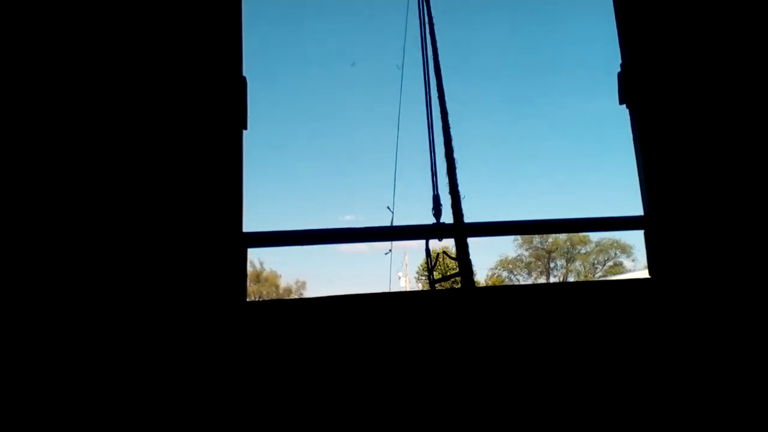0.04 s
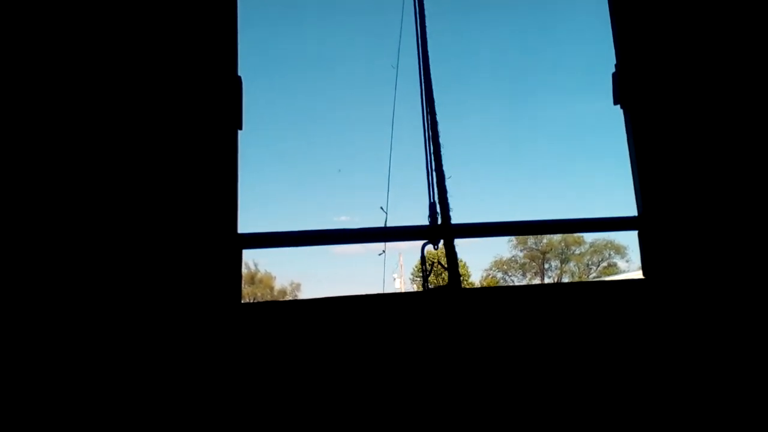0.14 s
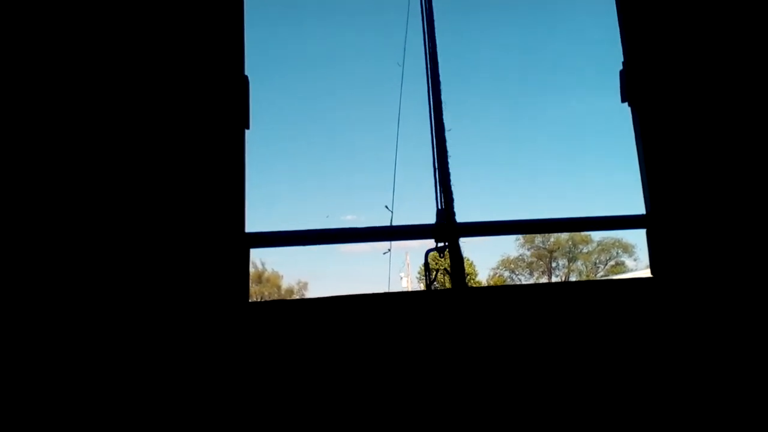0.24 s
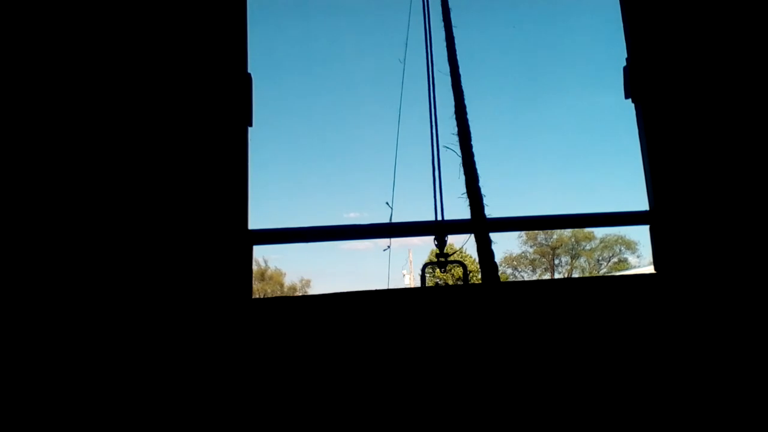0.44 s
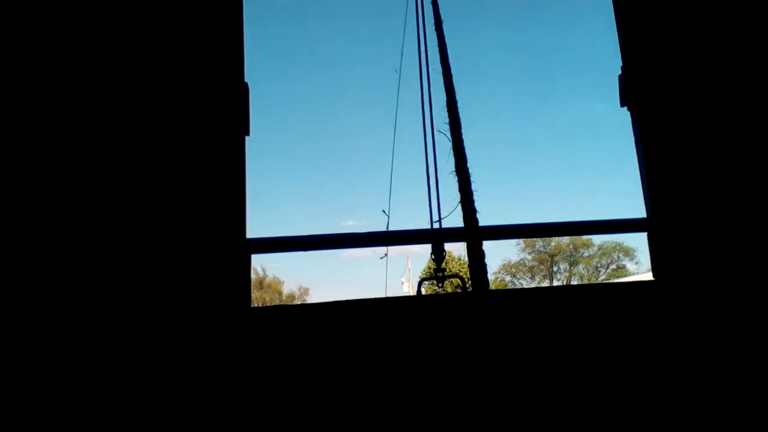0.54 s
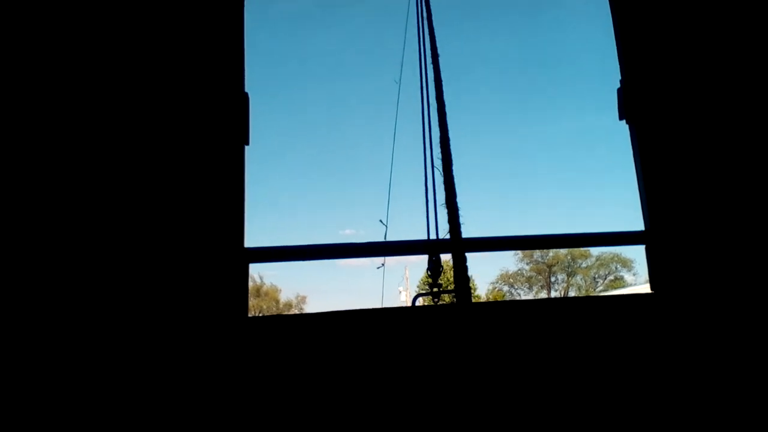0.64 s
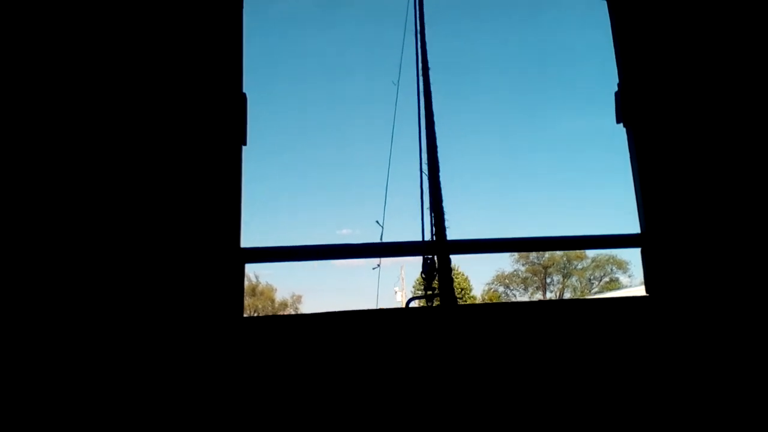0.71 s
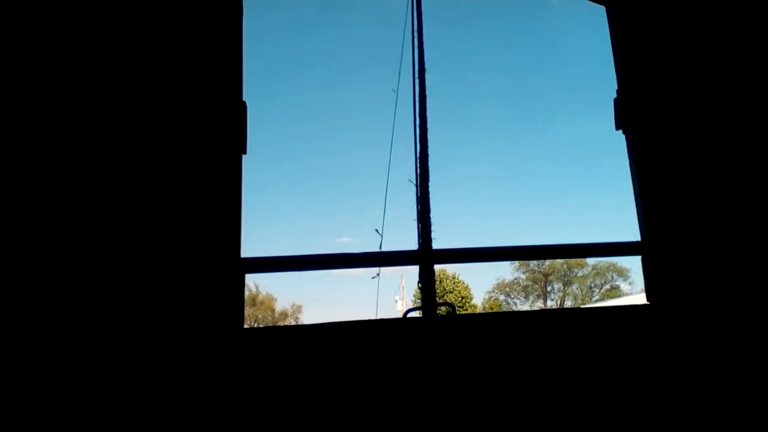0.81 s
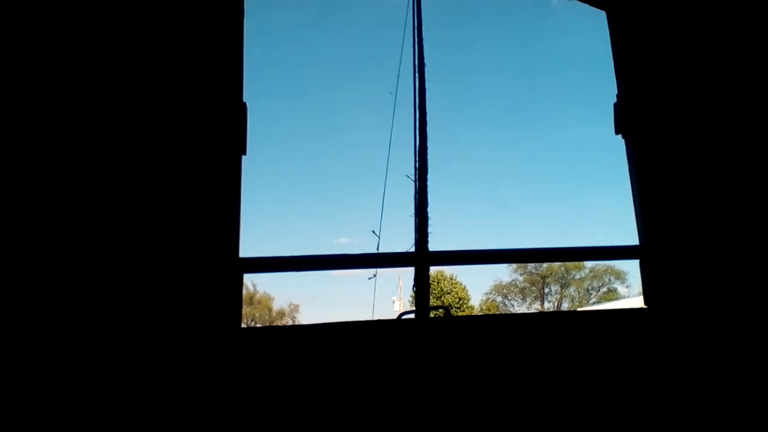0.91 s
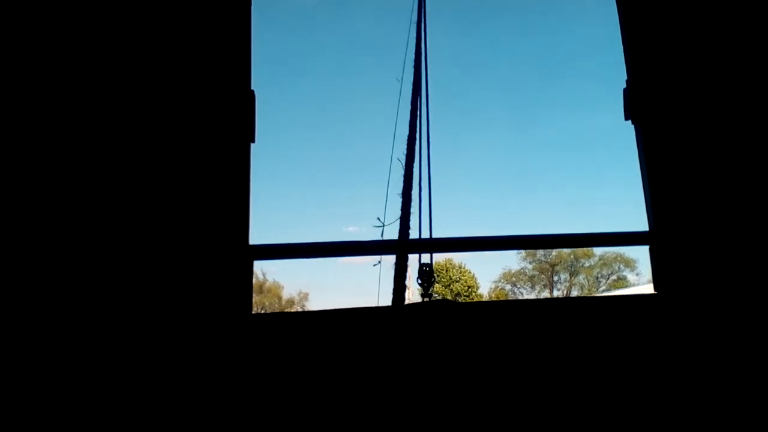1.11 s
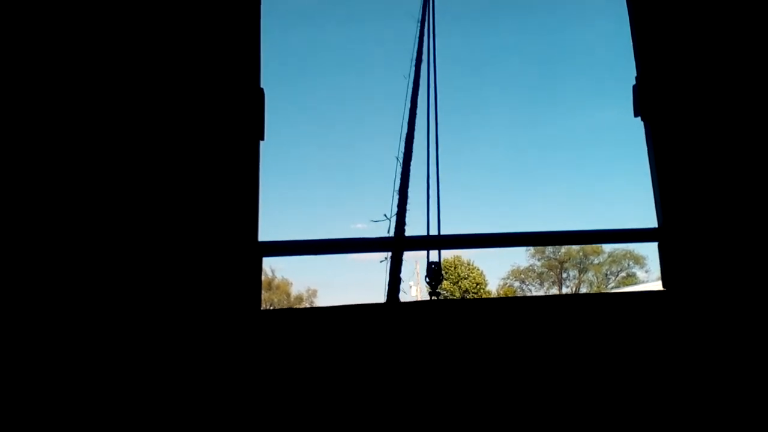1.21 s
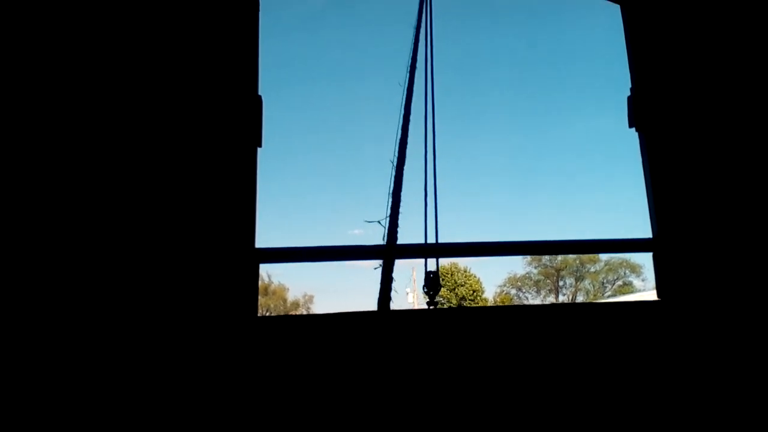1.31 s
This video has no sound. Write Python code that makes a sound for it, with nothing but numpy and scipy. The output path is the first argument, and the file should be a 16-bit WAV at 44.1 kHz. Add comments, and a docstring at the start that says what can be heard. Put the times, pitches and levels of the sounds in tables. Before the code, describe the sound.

Rope and pulley gear thuds against timbers inside a wooden barn, just after a very faint squeak. A low boom dies away with a few soft bumps and light rope rubbing, heard through one microphone over soft hiss.

```python
"""A quick cluster of dull thuds as rope rigging jerks taut against timbers, heard inside a wooden barn.
A faint pulley squeak leads in; the rope creaks under the load and the pulley block knocks. Near boards
echo each blow, the building booms and dies away, and the rope rubs and hums as it settles.
One microphone, mono. Behind it all: a soft hiss that swells and briefly drops out, a thin high hiss
and a faint rumble."""
import sys
import numpy as np
from scipy import signal
from scipy.fft import rfft, irfft
from scipy.io import wavfile

SR = 44100
rng = np.random.default_rng(int(sys.argv[2]) if len(sys.argv) > 2 else 0)


def pcm_store(signal):
    """Save signal as 16-bit PCM."""
    levels = np.round(np.clip(np.atleast_2d(signal), -1, 1) * 32767)
    wavfile.write(sys.argv[1], SR, levels.astype(np.int16).T)


N = 59535
T = np.arange(N) / SR

# Blows on the timbers. Each row: start in seconds, relative level in dB, contact time in ms.
TIMBER_BLOWS = [(0.2148, -23.5, .9), (0.2227, -1, 0.3), (.244, 0, 0.37), (0.2614, 5, 0.67),
                (.277, -0.5, 0.76), (.323, -7, 1), (.33, -5, 0.31), (.386, -10, 0.8), (0.403, -11.5, 0.26),
                (.545, -15, 3.0), (0.661, -15, 3.64), (.742, -12.5, 4.4)]
# Knocks of the pulley block. Each row: start in seconds, relative level in dB.
BLOCK_KNOCKS = [(.2885, -10.5), (.2912, 0), (.2975, -9), (.3055, -8)]

# How each body rings. Each row: frequency in Hz, relative level in dB, seconds to fall 60 dB.
TIMBER_MODES = [(132.9, -10.5, 0.82), (176.7, -3, 0.12), (209.4, 2.5, 0.41), (274, -7.5, 0.39),
                (340.9, -6, 1), (377.6, -2.5, 0.59), (400, -16.5, 0.1), (620, -15.5, 0.25),
                (751, 2.5, 0.52), (860, 0.5, 0.34), (826, 4, 0.43), (1095, -12.5, 0.74), (1103, -3.5, 0.18),
                (1269, 6.5, 0.33)]
BLOCK_MODES = [(618, -20, .1), (718, 2.5, .22), (750, -5, 0.065), (910, -5, 0.17), (1526, -3, .11),
               (1564, 2.5, 0.034), (1711, 4.5, 0.21), (1740, -13.5, 0.082)]
CREAK_MODES = [(1281, -0.5, 0.15), (1360, -8, 0.01), (1780, 4, 0.005), (2172, -5.5, 0.045),
               (2447, -7.5, 0.031)]
BUILDING_MODES = [(42.8, -8.5, 1.6), (62.15, 4, 0.43), (68.7, 0.5, 0.17), (83.2, 2, .6)]

# Colour of each crack and noise. Each row: frequency in Hz, relative spectral density in dB.
TIMBER_CRACK_COLOUR = [(30, -37.5), (85, -15.5), (170, 0.5), (300, -6), (540, -5.5), (820, -0.5),
                       (1000, -6.5), (1400, -7), (2400, -5), (3200, -13.5), (4200, -23.5), (5300, -40),
                       (6500, -86)]
BLOCK_CRACK_COLOUR = [(30, -24), (150, -9), (420, -3), (560, -1.5), (800, 1), (1050, -9.5), (1620, -2.5),
                      (2000, -8), (2500, -6), (3200, -14.5), (4200, -25.5), (5300, -45), (6500, -84.5)]
BOOM_COLOUR = [(20, -17), (40, -7.5), (62, -0.5), (80, -5.5), (110, 2.5), (200, -30), (500, -73)]
RUB_COLOUR = [(100, -17), (300, -7), (650, 1.5), (1000, -15.5), (1450, 4), (1750, -3), (2300, -11),
              (3000, -17), (5000, -53)]
SOFT_HISS_COLOUR = [(100, -4.5), (500, -13), (1000, -12.5), (1450, -12), (1850, -7), (2100, 1), (2450, 0.5),
                    (3100, -0.5), (3700, -6.5), (4400, -17), (5300, -38.5), (7000, -61)]
HIGH_HISS_COLOUR = [(5000, -32.5), (10500, -30.5), (11300, -16.5), (12200, -12), (13000, -5), (13800, 0),
                    (14600, -4), (15500, -15.5)]
RUMBLE_COLOUR = [(20, -19.5), (65, 0.5), (170, -3), (300, -9.5), (700, -16), (1500, -15.5),
                 (3000, -30), (5500, -55), (9000, -85.5)]

# Treble loss of the ringing parts. Each row: frequency in Hz, relative gain in dB.
RING_TREBLE_LOSS = [(2500, -3.5), (4000, -5), (6000, -54)]
# Reverberation of the barn. Each row: frequency in Hz, seconds to fall 60 dB.
BARN_T60 = [(60, 0.95), (150, 0.73), (400, 0.8), (800, 0.52), (1500, 0.37), (4000, 0.33)]
# Level of the two background hisses over time. Each row: time in seconds, level in dB.
SOFT_HISS_LEVEL = [(0, -67.5), (.17, -62), (.26, -59.5), (.5, -64), (.62, -61.5), (.76, -63), (.8, -69),
                   (.845, -87.5), (.89, -83.5), (.93, -75), (1.01, -69), (1.13, -65.5), (1.19, -69),
                   (1.24, -65), (1.29, -72), (1.35, -72)]
HIGH_HISS_LEVEL = [(0, -73), (.12, -71), (.18, -69.5), (.23, -68.5), (.26, -73), (.33, -72.5), (.38, -69),
                   (.43, -73), (.47, -69), (.7, -69.5), (.82, -70.5), (1.03, -74), (1.1, -70.5),
                   (1.25, -70.5), (1.35, -71.5)]


def timber_thuds():
    """The rope snatches at the timbers in a cluster of dull blows, then bumps softly as it settles."""
    force = sum(blow(at, db, contact_ms) for at, db, contact_ms in TIMBER_BLOWS)
    return undb(-4.5) * struck_wood(force, TIMBER_CRACK_COLOUR, TIMBER_MODES, ring_db=-5.5, room_db=-1)


def block_knocks():
    """The pulley block knocks and rebounds in short, hard contacts."""
    force = sum(blow(at, db, contact_ms=0.089) for at, db in BLOCK_KNOCKS)
    return undb(-9) * struck_wood(force, BLOCK_CRACK_COLOUR, BLOCK_MODES, ring_db=7, room_db=0)


def blow(at, db, contact_ms):
    """The force of one blow; a longer contact is duller."""
    force = (T >= at) * np.exp(-np.maximum(T - at, 0) * 1000 / contact_ms)
    return undb(db) * force / force.sum()


def struck_wood(force, colour, modes, ring_db, room_db):
    """A crack and a ring reach the microphone directly and by way of the barn."""
    crack = wood_smear(convolve(force, causal_response(colour)))
    ring = undb(ring_db) * convolve(force, muffled_ring(modes))
    into_room = crack + undb(-17.5) * ring  # the ring sends less into the room than the crack
    return crack + ring + undb(room_db) * barn_echoes(into_room)


def wood_smear(crack):
    """Travelling through wood spreads a sharp crack over a few milliseconds."""
    for hz in (500, 1300, 2330):
        b, a = signal.iirpeak(hz, Q=1.27, fs=SR)
        crack = crack - 2 * signal.lfilter(b, a, crack)  # all-pass: delays this range a little
    return crack


def muffled_ring(modes):
    """The decaying modes of a struck body, without the click at their start."""
    ring = sum(undb(db) * fade(t60) * np.sin(2 * np.pi * hz * T) for hz, db, t60 in modes)
    return unit_energy(convolve(ring, causal_response(RING_TREBLE_LOSS)))


def rope_creak():
    """A short burst of tiny slips as the rope takes the load."""
    slips_per_s = 3000
    slips = random_clicks(slips_per_s) * np.sqrt(SR / slips_per_s)  # rms near 1
    burst = slips * swell(at=0.2437, width_s=0.011)
    return undb(-35) * convolve(burst, muffled_ring(CREAK_MODES))


def building_boom():
    """Walls and floor take up the jolt slowly, swing in a few low modes and rumble on."""
    start_s, rise_s = 0.235, 0.095
    rise = np.clip((T - start_s) / rise_s, 0, 1) ** 2
    since_peak = T - start_s - rise_s
    envelope = lambda t60: rise * fade(t60, np.maximum(since_peak, 0))
    swing = sum(undb(db) * envelope(t60) * np.sin(2 * np.pi * hz * since_peak)
                for hz, db, t60 in BUILDING_MODES)
    rumble = envelope(t60=1.0) * noise(BOOM_COLOUR)
    return undb(-48) * swing + undb(-45.5) * rumble


def pulley_squeak():
    """The sheave gives a thin, unsteady, falling squeak just before the thuds."""
    at, centre_hz, sag_hz_per_s = 0.18, 2142, 1800
    waver = 0.005 * noise([(150, 0), (600, -40), (2000, -100)])
    hz = (centre_hz - sag_hz_per_s * (T - at)) * (1 + waver)
    return undb(-63.5) * swell(at, width_s=0.012) * tone(hz)


def rope_rub():
    """The taut rope rubs faintly and hums as it settles."""
    waver = 0.0083 * noise([(15, 0), (60, -40), (200, -100)])
    hum = swell(at=0.634, width_s=0.09) * tone(hz=130 * (1 + waver))
    rub = swell(at=0.636, width_s=0.047) * noise(RUB_COLOUR)
    return undb(-65.5) * rub + undb(-60) * hum


def barn_echoes(sound):
    """Echoes off near boards, then a diffuse tail in which the lows stay longest."""
    build_up = 1 - np.exp(-T / 0.0013)
    early = random_clicks(per_s=2500) * fade(t60=0.17) * build_up
    lowest_hz = 40
    octave = np.log2(np.maximum(np.fft.rfftfreq(N, 1 / SR), lowest_hz) / lowest_hz)
    spectrum = rfft(rng.standard_normal(N))
    tail = np.zeros(N)
    for k in range(9):
        band = irfft(spectrum * np.maximum(1 - abs(octave - k), 0), N)
        tail += band * fade(over_hz(BARN_T60, lowest_hz * 2 ** k))
    return convolve(sound, undb(2.5) * unit_energy(early) + undb(-2.5) * unit_energy(tail * build_up))


def background():
    """Background: a soft hiss that swells and briefly drops out, a thin high hiss and a low rumble."""
    gain = lambda levels: undb(np.interp(T, *np.array(levels).T))
    soft_hiss = gain(SOFT_HISS_LEVEL) * noise(SOFT_HISS_COLOUR)
    high_hiss = gain(HIGH_HISS_LEVEL) * noise(HIGH_HISS_COLOUR)
    return soft_hiss + high_hiss + undb(-74.5) * noise(RUMBLE_COLOUR)


def undb(db):
    """Decibels to gain."""
    return 10 ** (np.asarray(db) / 20)


def unit_energy(x):
    """Scale to an energy of one."""
    return x / np.sqrt(np.sum(x ** 2))


def fade(t60, age=T):
    """A decay of 60 dB in t60 seconds."""
    return np.exp(-np.log(1000) * age / t60)


def swell(at, width_s):
    """A smooth rise and fall around a moment given in seconds."""
    return np.exp(-.5 * ((T - at) / width_s) ** 2)


def tone(hz):
    """A sine that follows a moving pitch, rms 1."""
    return np.sqrt(2) * np.sin(2 * np.pi * np.cumsum(hz) / SR)


def random_clicks(per_s):
    """Impulses of either sign at random moments."""
    return (rng.random(N) < per_s / SR) * rng.choice([-1, 1], N)


def convolve(x, response):
    """Pass a sound through a response."""
    return signal.fftconvolve(x, response)[:N]


def over_hz(table, hz):
    """Read a table on a log-frequency axis."""
    table_hz, values = np.array(table, float).T
    return np.interp(np.log(np.maximum(hz, 1)), np.log(table_hz), values)


def spectral_gain(colour):
    """The gain of a colour at every frequency bin."""
    return undb(over_hz(colour, np.fft.rfftfreq(N, 1 / SR)))


def noise(colour):
    """Noise of rms 1, coloured by rows of frequency in Hz and relative level in dB."""
    x = irfft(rfft(rng.standard_normal(N)) * spectral_gain(colour), N)
    return x / x.std()


def causal_response(colour):
    """The shortest causal response with a given colour."""
    cepstrum = irfft(np.log(spectral_gain(colour)), N)
    cepstrum[1:N // 2] *= 2  # fold onto positive time for minimum phase
    cepstrum[N // 2:] = 0
    return unit_energy(irfft(np.exp(rfft(cepstrum)), N))


def scene():
    """The rigging sounds in the barn, over the background, in mono."""
    rigging = pulley_squeak() + timber_thuds() + rope_creak() + block_knocks()
    return (rigging + building_boom() + rope_rub() + background())[None]


def record(dry):
    """The recorder cuts the top."""
    top_hz = 15700
    return signal.sosfilt(signal.ellip(10, .2, 70, top_hz, fs=SR, output="sos"), dry)


dry = scene()
out = record(dry)
pcm_store(out)
```